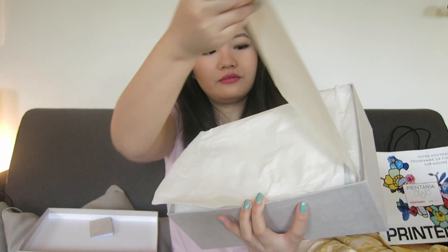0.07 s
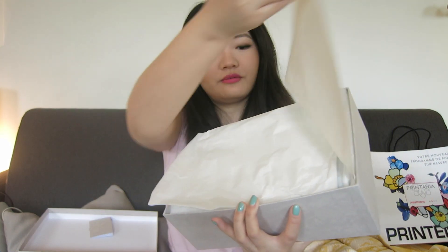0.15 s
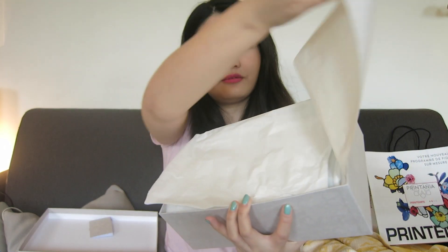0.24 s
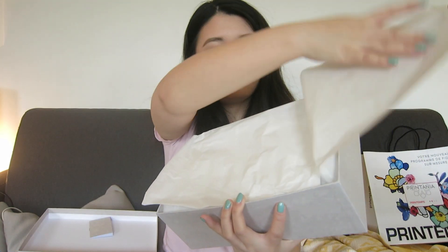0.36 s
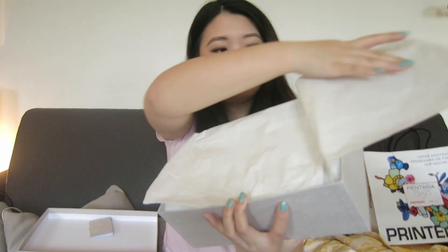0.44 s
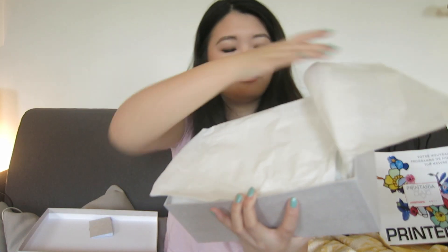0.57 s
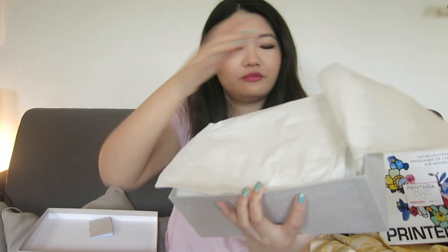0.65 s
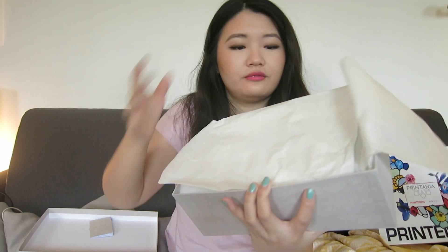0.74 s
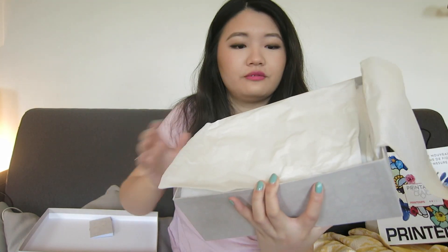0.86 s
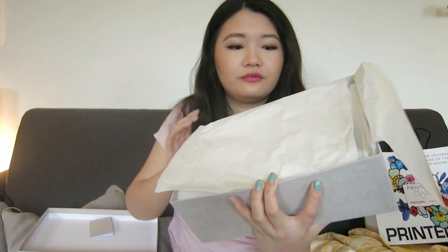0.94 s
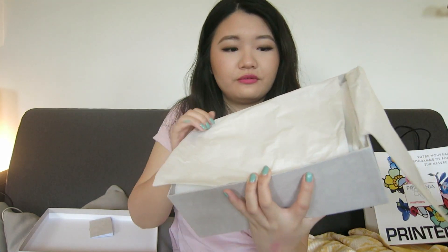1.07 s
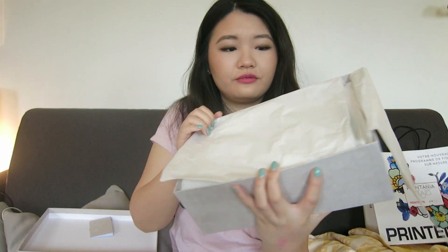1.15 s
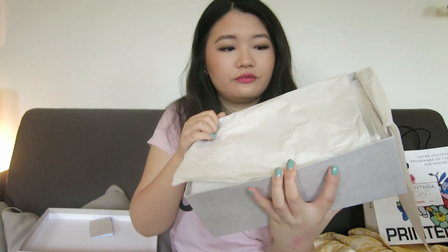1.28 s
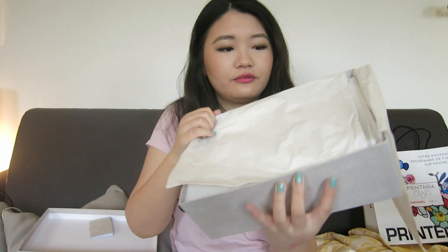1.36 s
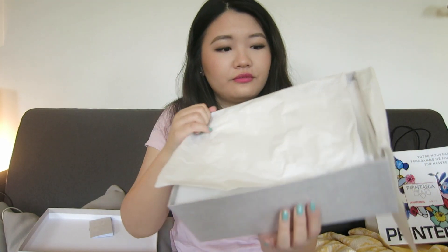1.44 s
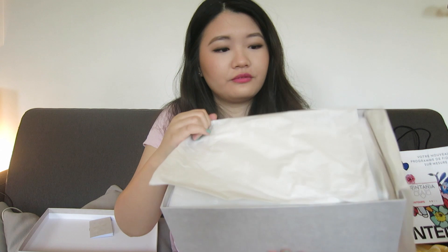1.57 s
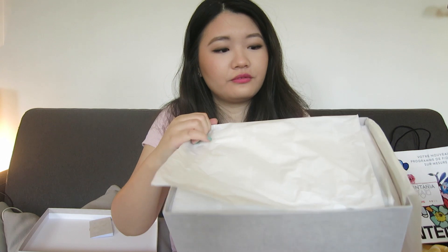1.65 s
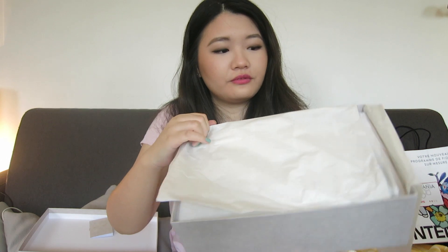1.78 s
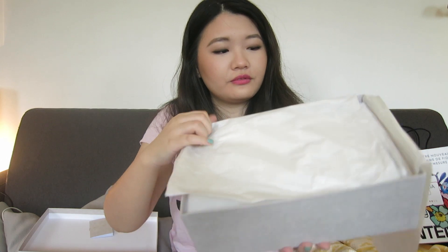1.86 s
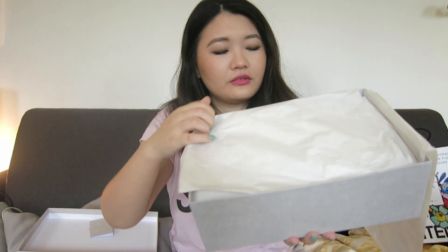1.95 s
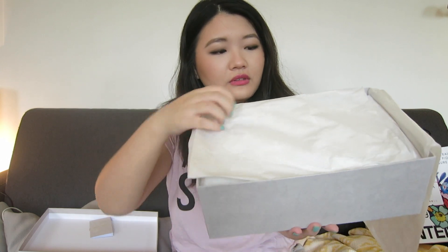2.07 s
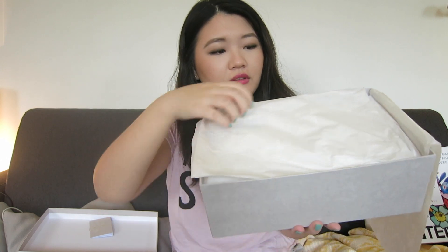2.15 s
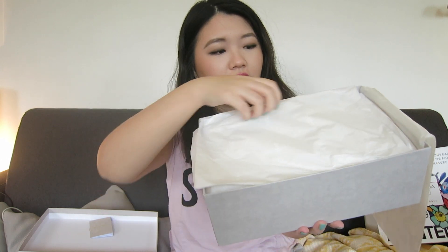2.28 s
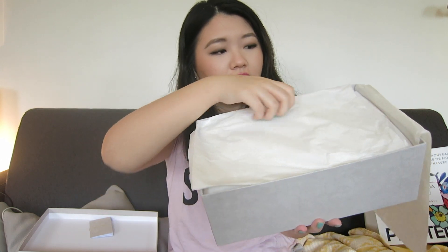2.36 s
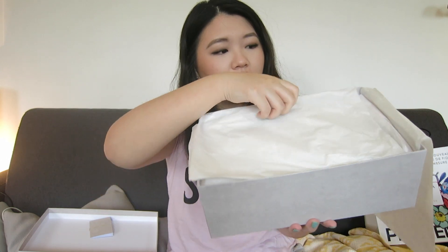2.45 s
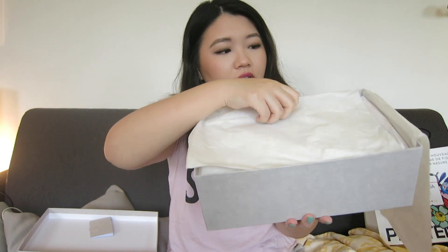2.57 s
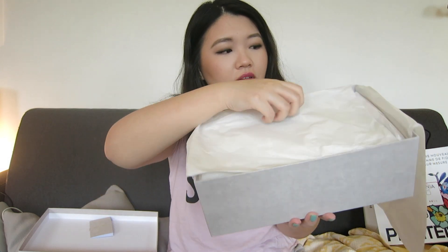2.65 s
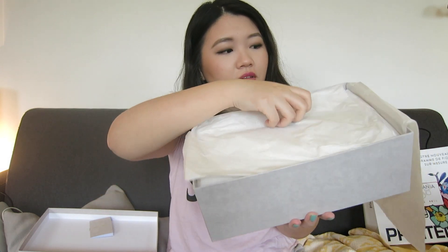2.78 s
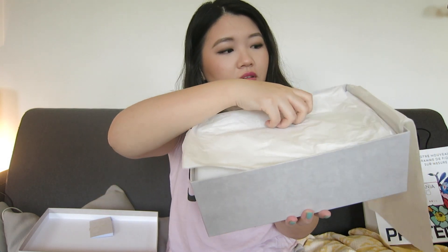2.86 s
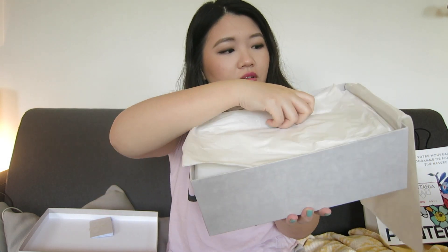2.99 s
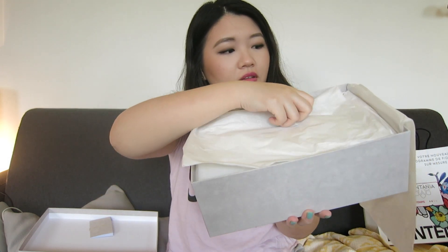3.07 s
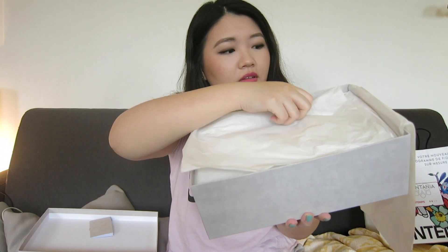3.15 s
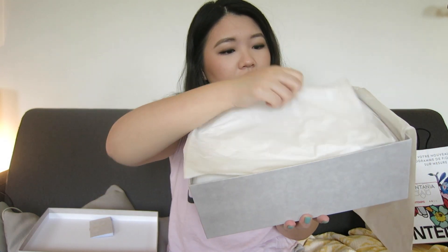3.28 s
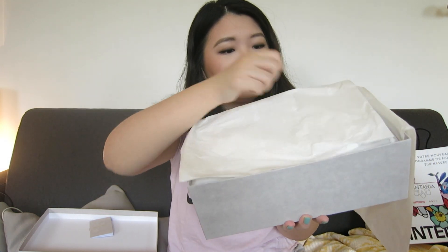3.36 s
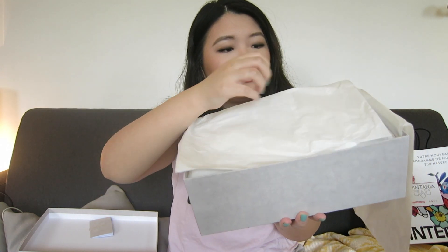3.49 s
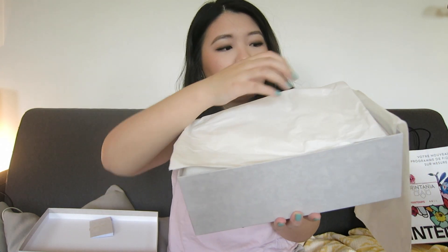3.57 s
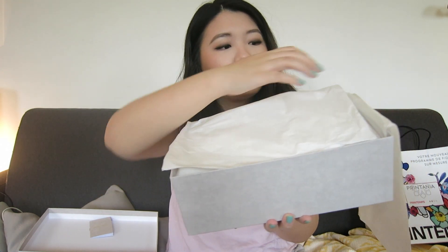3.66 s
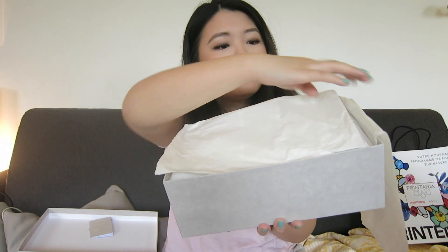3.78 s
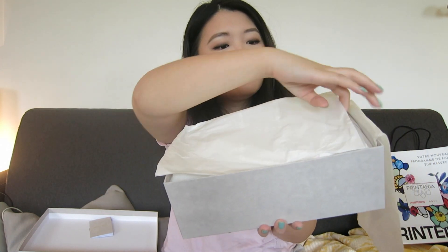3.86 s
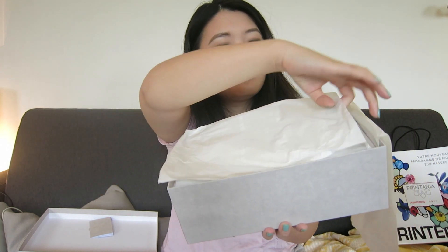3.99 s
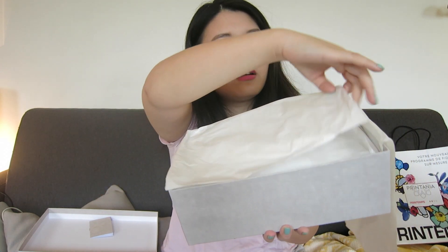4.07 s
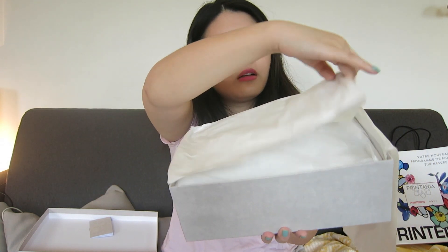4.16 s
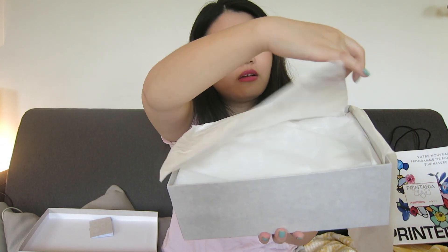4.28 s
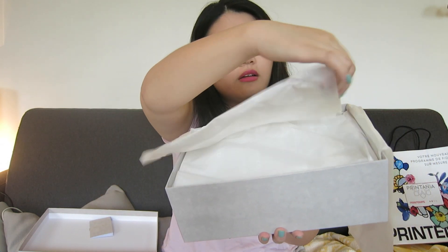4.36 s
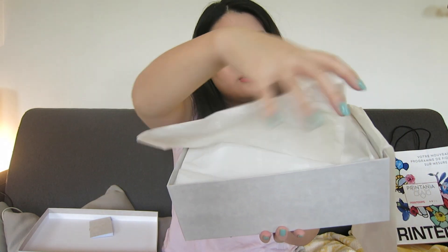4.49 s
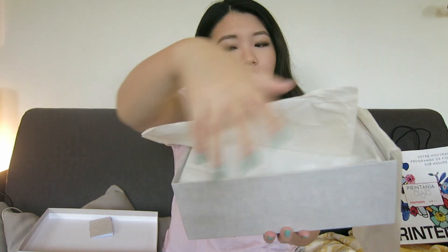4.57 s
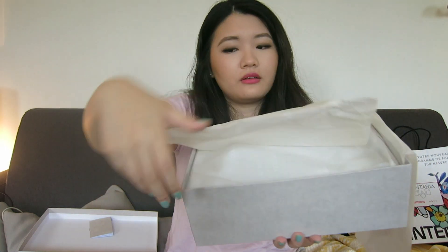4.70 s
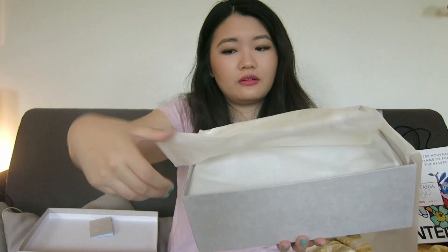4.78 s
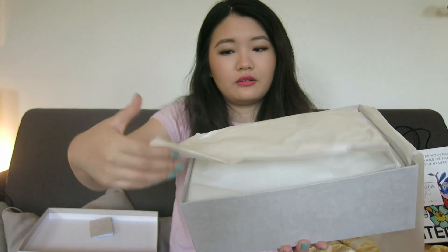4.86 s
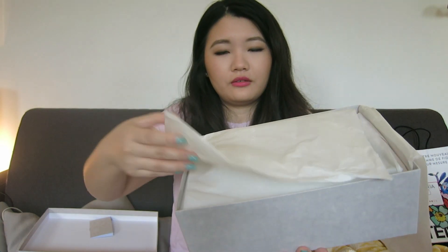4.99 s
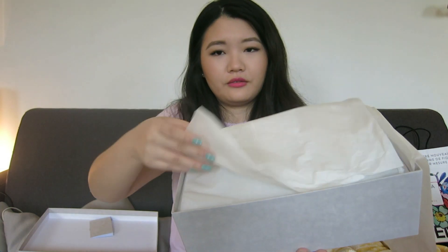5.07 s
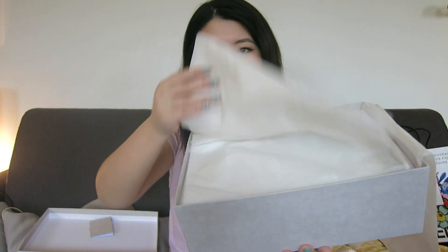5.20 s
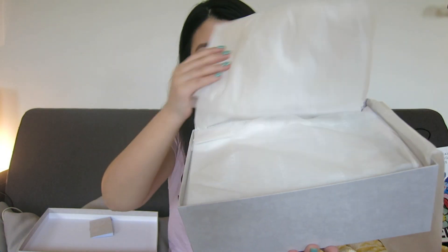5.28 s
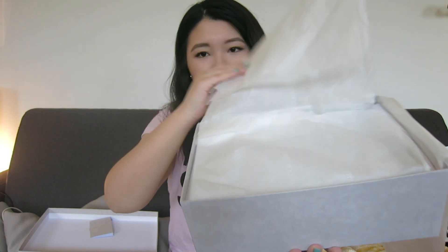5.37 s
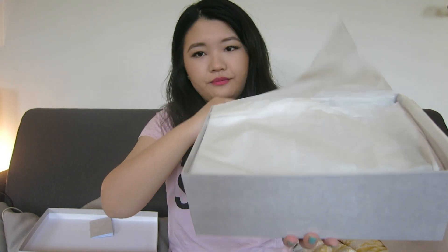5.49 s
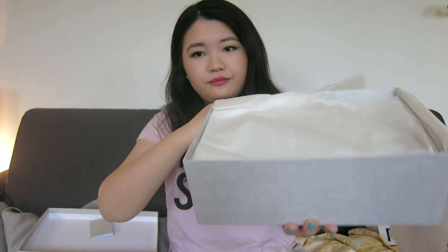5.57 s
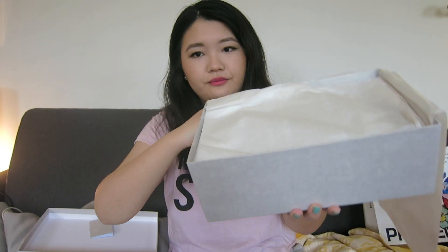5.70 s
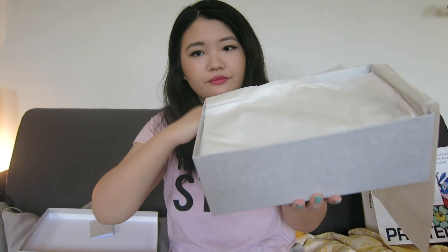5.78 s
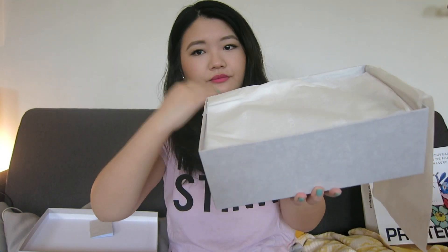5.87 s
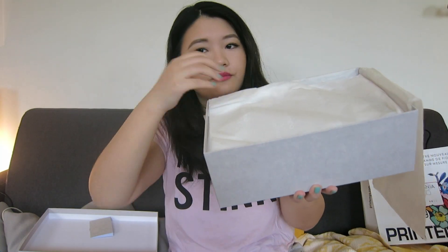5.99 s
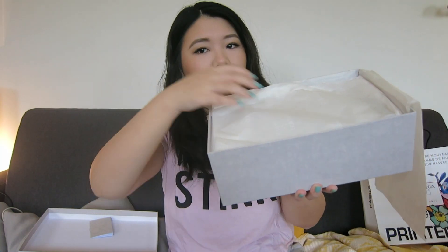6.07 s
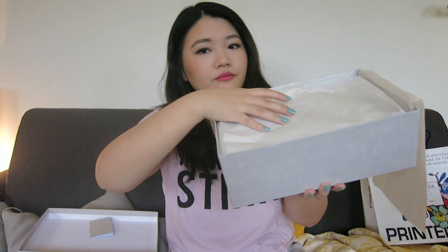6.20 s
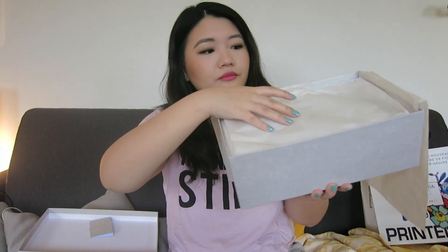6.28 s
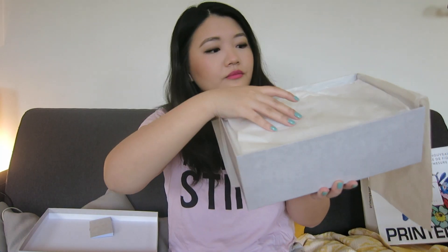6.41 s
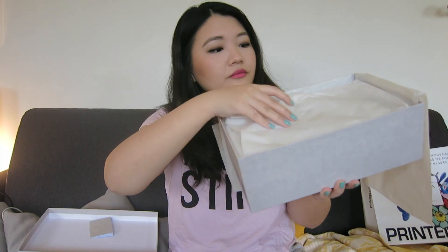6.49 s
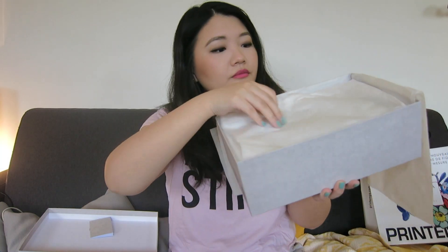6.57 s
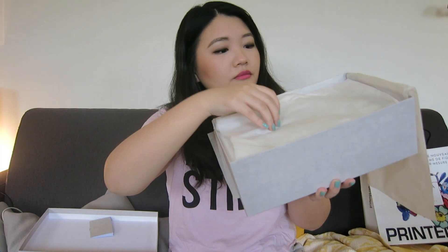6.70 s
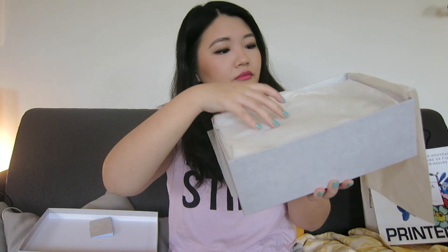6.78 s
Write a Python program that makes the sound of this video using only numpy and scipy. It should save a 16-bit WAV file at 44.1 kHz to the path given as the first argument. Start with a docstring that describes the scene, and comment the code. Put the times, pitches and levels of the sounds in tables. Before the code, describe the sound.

Close, dry tissue paper handling in a small furnished room, centred, with a brief diffuse echo and a faint, wide low rush and hum. At 0-0.7 s a soft rustle is broken by a sharp flick at 0.4. From 0.7 to 2.2 s short strokes come amid many bright crease snaps, strongest around 1.2-1.4, where two nearly merged dull cardboard bumps land. From 2.4 to 3.4 s rustling is fuller, with rapid tugs, another muffled bump at 2.85 and hard cracks at 2.9 and 3.3. It almost stops until 3.9. A rising crinkle and strong flips follow to 4.6, a lull with a light drag at 4.8, then the biggest airy sweeps at 5.1-5.6. It quiets to sparse ticks by 6.1, then short crisp rubs at 6.2 and 6.4-6.7 and a final snap near 6.8.

```python
"""Small furnished room: sheets of tissue paper are lifted, folded back and smoothed by hand in a cardboard box.
Moving paper is hiss plus clumped bursts of tiny buckles, split into crisp fibres, a stiff sheet and a flexing sheet.
Single creases snap as short pitched cracks with a noise tail; three bumps on the box are dull noise thuds.
The room adds a brief diffuse echo, a low wide rush of shaped noise and faint wavering hum tones."""
import sys
import numpy as np
from scipy import signal
from scipy.fft import rfft, irfft, next_fast_len
from scipy.io import wavfile
from scipy.ndimage import uniform_filter1d, map_coordinates

SR = 44100
rng = np.random.default_rng(int(sys.argv[2]) if len(sys.argv) > 2 else 0)


def inscribe(sig):
    """Save sig as 16-bit PCM at rate SR to the path in sys.argv[1].

    A 1-D sig is mono; a 2-D sig holds one channel per row.
    Samples are clipped to [-1, 1] before scaling.
    """
    pcm = np.round(np.clip(np.atleast_2d(sig).T, -1, 1) * 32767)
    wavfile.write(sys.argv[1], SR, pcm.astype(np.int16))


N = 301644  # samples

# hand drags paper at even speed: start_s, length_s, level_db
DRAGS = [(-.03, 0.65, -42), (.05, 0.37, -34), (.715, .41, -43), (.8, 0.16, -37), (1.12, 0.59, -36),
         (1.701, .47, -47), (1.915, 0.15, -37), (2.38, 0.099, -42), (2.429, 0.5, -33), (2.965, 0.46, -31),
         (3.6, 0.072, -44.5), (3.94, .63, -35), (4.582, 0.24, -45), (4.79, 0.28, -38.5), (5.08, .58, -30.5),
         (5.677, .2, -43.5), (5.878, 0.29, -51), (6.197, 0.15, -36), (6.42, 0.29, -35.5),
         (6.729, 0.093, -40)]
# quick tugs and flips: peak_s, level_db, half_width_s
TUGS = [(.425, -25, 0.024), (.56, -38, 0.016), (.9, -35, 0.028), (1.289, -25, .028), (1.375, -30, 0.041),
        (1.634, -32, 0.019), (2.0, -29, .02), (2.169, -40, 0.017), (2.47, -29, 0.023), (2.616, -29, 0.019),
        (2.712, -26, 0.016), (2.8, -29, 0.024), (2.865, -24, .022), (3.135, -29, 0.023), (3.29, -28, 0.021),
        (3.34, -23, .016), (4.05, -30, 0.011), (4.14, -27, 0.017), (4.22, -24, 0.04), (4.35, -27, .02),
        (4.475, -24, .045), (4.56, -26, .016), (5.125, -26, .022), (5.24, -22.5, 0.036),
        (5.39, -25.5, 0.045), (5.505, -24, 0.029), (5.839, -39.5, .028), (6.225, -26.5, .014),
        (6.54, -30.5, .04), (6.62, -25, .034), (6.8, -31.5, 0.0071)]
# handling: time_s, stiff_sheet_db, hiss_re_buckles_db (base value, offset per layer in rustle)
HANDLING = [(0, -6.5, 5), (.9, -7, 5), (1.3, -9, -0.5), (2, -11, 5), (2.8, -8, 4), (4.2, -10, 8.5),
            (5.3, -11, 8), (5.7, -7.5, 6), (6.3, -7.5, 3), (6.84, -7, -0.5)]
# bending of the whole sheet: time_s, level_db
FLEX = [(0, -15.5), (.7, -16), (1.3, -15.5), (3.1, -14.5), (3.7, -20), (5, -19), (5.6, -14), (6.84, -16)]
# spectrum of buckling fibres: freq_hz, density_db_per_hz (relative)
CRISP_SPECTRUM = [(1650, -39), (2800, -28.5), (3640, -33.5), (4840, -5), (11400, 6.5), (12400, 5),
                  (14900, -2), (16000, -10)]
# spectrum of stiffer top sheet: freq_hz, density_db_per_hz (relative)
STIFF_SPECTRUM = [(1500, -23), (2600, -10), (4000, 5), (6500, 4), (9000, 2.5), (14000, -20.5)]
# spectrum of flexing sheet: freq_hz, density_db_per_hz (relative)
SHEET_SPECTRUM = [(100, -17.5), (220, -10), (450, -4), (850, -3), (1080, -6), (1350, -1), (1620, -3),
                  (1950, 1.5), (2250, -1.5), (2570, -0.5), (3500, -10), (5000, -49)]
# room decay: freq_hz, t60_s
ROOM_DECAY = [(200, 0.36), (2000, 0.4), (10000, 0.32)]
# echo stereo width: freq_hz, side_re_mid_db
ECHO_WIDTH = [(150, 9), (500, -18), (1000, -1.5), (2000, -11), (4000, -109), (8000, -39.5), (12000, 5)]
# room rush: time_s, level_db
RUSH = [(0, -40.5), (2.4, -38), (2.9, -41), (3, -48), (4.2, -43), (5.2, -47), (6.84, -41.5)]
# rush spectrum: freq_hz, density_db_per_hz (relative)
AIR_SPECTRUM = [(25, -58), (50, -9.5), (160, -1.5), (260, -4), (500, -6), (1000, -11.5), (3500, -37),
                (16000, -55)]
# rush stereo width: freq_hz, side_re_mid_db
AIR_WIDTH = [(40, 9), (70, 16.5), (150, 7.5), (1300, 8), (7000, -19.5)]
# hum tones: freq_hz, mean_level_re_rush_db
HUM = [(44, -29), (144, -21), (258, -16.5)]
# larger creases that snap: start_s, level_db, pitch_hz, tail_energy_re_crack_db
SNAPS = [(0.5506, -24.5, 10300, -11), (0.7264, -35, 6500, -13), (0.8039, -32.5, 10100, 11.5),
         (0.8533, -27.5, 9400, -8), (0.92, -29, 8900, 9.5), (.954, -24, 9300, 0), (1.1058, -26, 10500, -16),
         (1.1702, -19, 10000, -5), (1.3322, -20.5, 12040, -1.5), (1.3708, -19.5, 9900, -14),
         (1.3932, -17, 11500, -5.5), (1.5766, -25.5, 11480, -12), (1.7006, -19.5, 11600, -15),
         (1.7414, -24, 11200, 2), (2.001, -33, 12070, -24), (2.0959, -27, 9200, -20),
         (2.1513, -32, 10600, -5), (2.2903, -39.5, 8720, 4.5), (2.347, -35, 10800, -9),
         (2.834, -22, 10700, 6), (2.9351, -16, 9400, -7), (2.971, -28, 11000, 3.5),
         (3.3005, -15, 9750, -14), (3.7285, -42, 10070, -9), (3.7564, -42.5, 8460, -2),
         (3.9551, -28.5, 10300, -4), (4.3924, -23, 10100, 4), (4.5098, -16.5, 9600, -7),
         (4.5295, -20, 11000, 4.5), (4.7216, -37, 8050, 1.5), (5.981, -35.5, 8730, 8.5),
         (6.0565, -33.5, 8600, -2), (6.204, -28.5, 9000, 6), (6.372, -28, 7480, -18),
         (6.3971, -21, 9560, -21), (6.4828, -24, 8740, -11), (6.7814, -16.5, 10500, -2),
         (6.7865, -25, 9520, 5)]
# rate of small creases, highest while the box is turned: time_s, creases_per_s
CRACKLE = [(0, 10), (.6, 40), (2.1, 45), (2.5, 8), (5.6, 8), (6.5, 22)]
# bumps on the box: start_s, level_db (before the gain in box)
BUMPS = [(1.39, -31.5), (1.400, -28.5), (2.849, -29.5)]
# cardboard spectrum: freq_hz, density_db_per_hz (relative)
CARDBOARD_SPECTRUM = [(80, -37), (180, -14), (450, -1), (900, -4.5), (1250, -21), (2100, 0), (3200, -16),
                      (8000, -37.5)]
# microphone balance: freq_hz, left_minus_right_db
BALANCE = [(300, 0), (1100, -.8), (2200, 0), (6500, 0), (9000, .7), (12000, 2.7)]

TOP_HZ = 16000  # band limit
DRAG_ATTACK_S, DRAG_RELEASE_S = 0.012, 0.028  # time constants
TUG_EDGE = 1.6  # 1 pointed swell, 2 rounded
REST_DB = -71  # paper barely stirs in the held box
CREASE_HZ, CREASE_SPREAD = 10040, 0.12  # typical pitch, log scatter
STILL_DB = -48  # motion level below which small creases thin out


def amp(db):
    """Amplitude from dB."""
    return 10 ** (np.asarray(db) / 20)


def unit(x):
    """Scale to RMS 1."""
    return x / np.sqrt(np.mean(x ** 2) + 1e-20)


def along(points, hz):
    """Interpolate (freq_hz, value) points on a log axis."""
    f, v = np.transpose(points)
    return np.interp(np.log(hz + 1), np.log(f + 1), v)


def curves(rows):
    """One value per sample for each column after the time."""
    s, *cols = np.transpose(rows)
    return [np.interp(np.arange(N) / SR, s, c) for c in cols]


def wobble(knots_per_s):
    """Smooth random curve."""
    knots = rng.standard_normal(N // 20)
    return map_coordinates(knots, [np.arange(N) * knots_per_s / SR], mode="wrap")


def filtered(x, response):
    """Multiply the spectrum of x by a response of frequency."""
    m = next_fast_len(N + SR // 2)
    return irfft(rfft(x, m) * response(np.fft.rfftfreq(m, 1 / SR)), m)[..., :N]


def coloured(x, spectrum):
    """Shape white x to a spectrum, keeping its power."""
    return filtered(x, lambda hz: unit(amp(along(spectrum, hz))))


def levelled(x):
    """Divide out slow swells (0.1 s RMS)."""
    return x / np.sqrt(np.abs(uniform_filter1d(x ** 2, size=4400)) + 1e-12)


def add(track, start_s, sound):
    """Mix a sound into a track in place."""
    part = track[max(round(start_s * SR), 0):][:len(sound)]
    part += sound[:len(part)]


def widened(mid, side, width):
    """Left and right from mid and side, side scaled by frequency."""
    side = filtered(side, lambda hz: amp(along(width, hz)))
    return np.array([mid + side, mid - side])


def motion():
    """Crinkling level in dB: powers of all drags and tugs add up."""
    t = np.arange(N) / SR
    power = np.full(N, amp(REST_DB) ** 2)
    for start_s, length_s, db in DRAGS:
        attack = 1 - np.exp(-np.maximum(t - start_s, 0) / DRAG_ATTACK_S)
        release = np.exp(-np.maximum(t - start_s - length_s, 0) / DRAG_RELEASE_S)
        power += (amp(db) * attack * release) ** 2
    for peak_s, db, half_width_s in TUGS:
        power += amp(db) ** 2 * np.exp(-np.abs((t - peak_s) / half_width_s) ** TUG_EDGE)
    return 10 * np.log10(power)


def avalanches(rate_hz, life_s, rest):
    """Strength of buckle runs: each trigger sets off its neighbours at once, then the run dies away."""
    triggers = (rng.random(N) < rate_hz / SR) * rng.random(N)
    power = signal.lfilter([1], [1, -np.exp(-2 / (life_s * SR))], triggers)
    return np.sqrt(rest + power)


def buckles(rate_hz, spread_db, life_s, ring_share=0.51):
    """Tiny buckles of unequal size: decaying bursts of noise plus a ring at a random pitch."""
    starts = np.flatnonzero(rng.random(N) < rate_hz / SR)
    t = np.arange(SR // 300) / SR
    sizes = amp(spread_db * np.minimum(rng.standard_normal((len(starts), 1)), 2))
    pitch_hz = TOP_HZ * rng.random((len(starts), 1))
    ring = np.sqrt(2) * np.sin(2 * np.pi * pitch_hz * t)
    noise = rng.standard_normal(ring.shape)
    bursts = sizes * np.exp(-t / life_s) * (ring_share * ring + (1 - ring_share) * noise)
    places = starts[:, None] + np.arange(len(t))
    return np.bincount(places.ravel(), bursts.ravel(), N)[:N]


def rustle(level_db, stiff_slide_db=3, sheet_slide_db=1, crisp_db=-1.5, sheet_growth=0.84, sheet_surge=0.53):
    """Sliding paper hisses under a stream of buckles; a faster stroke makes them louder and denser."""
    stiff_db, slide_db = curves(HANDLING)
    pace = amp(0.8 * (level_db + 30))
    runs = avalanches(240 * pace, life_s=0.003, rest=0.2) * amp(1.8 * wobble(150))
    ticks = levelled(buckles(1200 * pace + 100, spread_db=5.5, life_s=0.00033))

    def paper(surge, hiss_db):
        hiss = amp(hiss_db) * rng.standard_normal(N)
        return levelled(surge * (ticks + hiss))

    crisp = amp(crisp_db + level_db) * paper(runs, slide_db)
    stiff = amp(stiff_db + level_db) * paper(runs, slide_db + stiff_slide_db)
    # whole sheet bends more slowly than fibres buckle, so it surges less
    bend_db = curves(FLEX)[0] + sheet_growth * level_db
    sheet = amp(bend_db) * paper(runs ** sheet_surge, slide_db + sheet_slide_db)
    return coloured(crisp, CRISP_SPECTRUM) + coloured(stiff, STIFF_SPECTRUM) + coloured(sheet, SHEET_SPECTRUM)


def room(x, low_db=-4, high_db=-13, count=36):
    """Short diffuse echo, redrawn each stretch as the paper moves; furnishings swallow most treble."""
    echo = np.zeros((2, N))
    for part in np.array_split(np.arange(N), count):
        hz, t, z = signal.stft(rng.standard_normal((2, SR // 4)), SR, nperseg=256)
        decay = amp(-60 * t / along(ROOM_DECAY, hz)[:, None])
        tails = signal.istft(z * decay, SR, nperseg=256)[1]
        for track, tail in zip(echo, tails):
            answer = signal.fftconvolve(x[part], tail / np.linalg.norm(tail))
            add(track, part[0] / SR + 0.002, answer)  # 2 ms delay
    mid, side = filtered(echo, lambda hz: amp(along([(600, low_db), (5000, high_db)], hz)))
    return widened(mid, side, ECHO_WIDTH)


def room_rush():
    """Low, very wide background noise that swells and sinks."""
    mid, side = coloured(rng.standard_normal((2, N)), AIR_SPECTRUM)
    pair = widened(mid, side, AIR_WIDTH)
    # undo the power that the width adds
    pair = filtered(pair, lambda hz: 1 / np.hypot(1, amp(along(AIR_WIDTH, hz))))
    return amp(curves(RUSH)[0]) * unit(pair)


def hum(waver_db=3, drift_rad=1.2):
    """Faint low sines wavering in level and pitch, following the rush level."""
    t = np.arange(N) / SR
    tones = np.zeros(N)
    for hz, db in HUM:
        level = amp(db + waver_db * wobble(1.553))
        tones += level * np.sin(2 * np.pi * hz * t + drift_rad * wobble(6.3))
    return amp(curves(RUSH)[0]) * tones


def stray_creases(level_db, typical_db=-31, growth=0.31, scatter_db=2.5, tail_db=-9, count=500):
    """Small creases give way at random while the paper moves; rows as in SNAPS."""
    where, chance = rng.random((2, count))
    size, tuning = rng.standard_normal((2, count))
    at = (where * N).astype(int)
    rate_hz = curves(CRACKLE)[0][at] * np.minimum(amp(level_db[at] - STILL_DB), 1) ** 2
    db = typical_db + growth * (level_db[at] - np.median(level_db)) + scatter_db * size
    pitch_hz = CREASE_HZ * np.exp(CREASE_SPREAD * tuning)
    rows = np.transpose([at / SR, db, pitch_hz, np.full(count, tail_db)])
    return list(rows[chance < rate_hz * N / SR / count])


def snaps(creases, tail_life_s=0.0037, noise_share=1.7, stiff_db=-12, sheet_db=-13):
    """A crease flips with a sharp, briefly ringing crack and a noise tail for the smaller buckles it sets off."""
    fibres, body = np.zeros((2, N))
    t = np.arange(SR // 50) / SR
    fade = np.exp(-t / 0.00055)

    def per_ms(burst):
        """Set energy to that of 1 ms at RMS 1."""
        return burst / np.linalg.norm(burst) * np.sqrt(SR / 1000)

    for start_s, db, pitch_hz, tail_db in creases:
        crack, tail = rng.standard_normal((2, len(t)))
        crack = (np.sin(2 * np.pi * pitch_hz * t) + noise_share * crack) * fade
        tail = tail * (np.exp(-t / tail_life_s) - fade)
        snap = amp(db) * (per_ms(crack) + amp(tail_db) * per_ms(tail))
        add(fibres, start_s, 0.82 * snap)
        add(body, start_s, snap * (CREASE_HZ / pitch_hz) ** 3)  # long, low creases shake more of the sheet
    stiff = amp(stiff_db) * coloured(body, STIFF_SPECTRUM)
    sheet = amp(sheet_db) * coloured(body, SHEET_SPECTRUM)
    return coloured(fibres, CRISP_SPECTRUM) + stiff + sheet


def box(contact_s=0.0064, gain_db=2):
    """Damped cardboard answers each bump with a short dull thud of decaying noise."""
    blows = np.zeros(N)
    t = np.arange(SR // 15) / SR
    for start_s, db in BUMPS:
        blow = np.exp(-t / contact_s) * rng.standard_normal(len(t))
        add(blows, start_s, amp(db + gain_db) * blow)
    return coloured(blows, CARDBOARD_SPECTRUM)


def scene():
    """Paper and box straight ahead, room all around."""
    level_db = motion()
    creases = list(SNAPS) + stray_creases(level_db)
    direct = rustle(level_db) + snaps(creases) + box()
    return direct + room(direct) + room_rush() + hum()


def record(dry):
    """Left microphone has a little more top treble; nothing is kept from the band limit up."""
    def response(hz):
        balance = amp(np.outer([0.5, -0.5], along(BALANCE, hz)))
        return balance * (hz < TOP_HZ)

    return filtered(dry, response)


dry = scene()
out = record(dry)
inscribe(out)
```